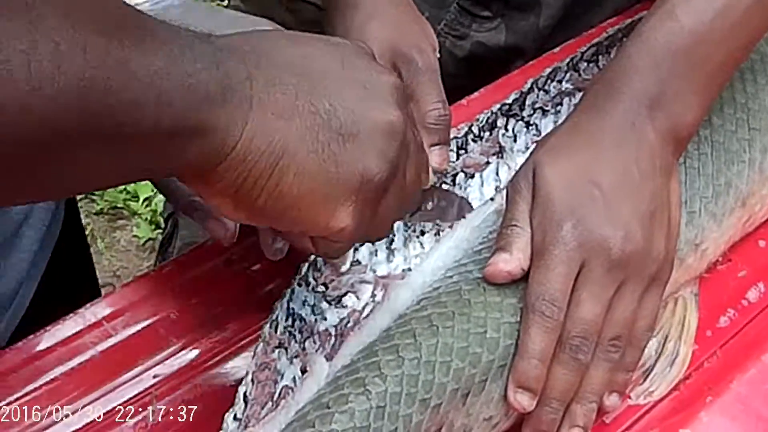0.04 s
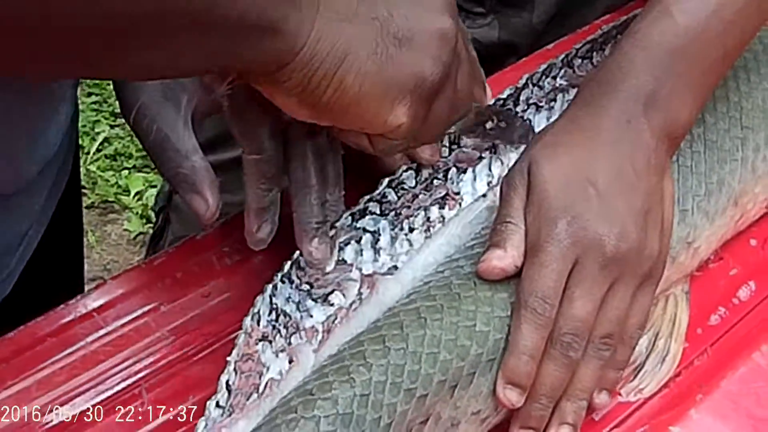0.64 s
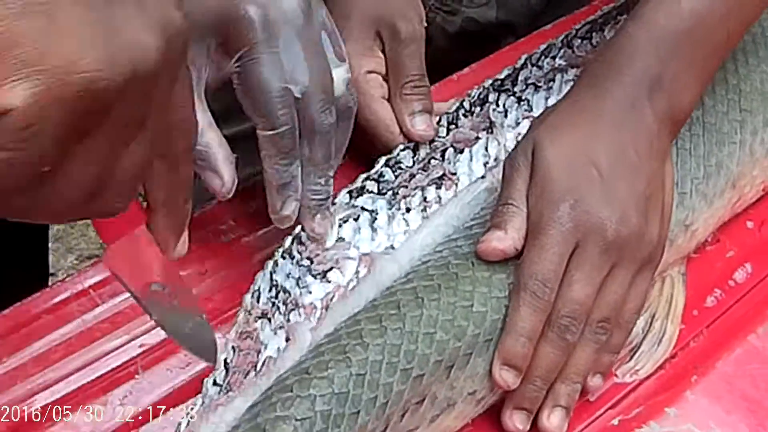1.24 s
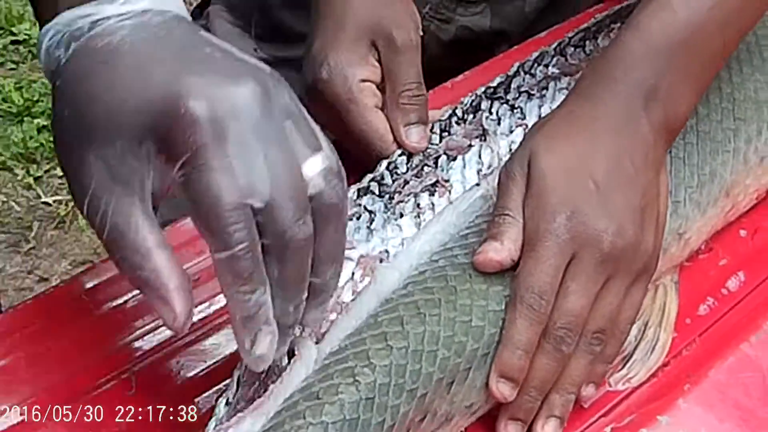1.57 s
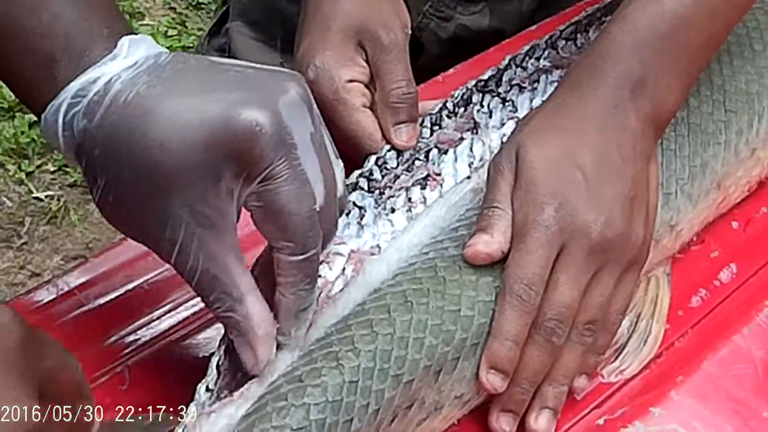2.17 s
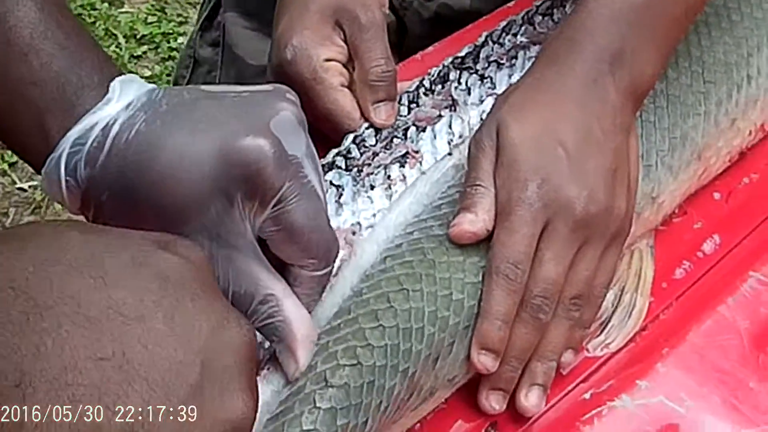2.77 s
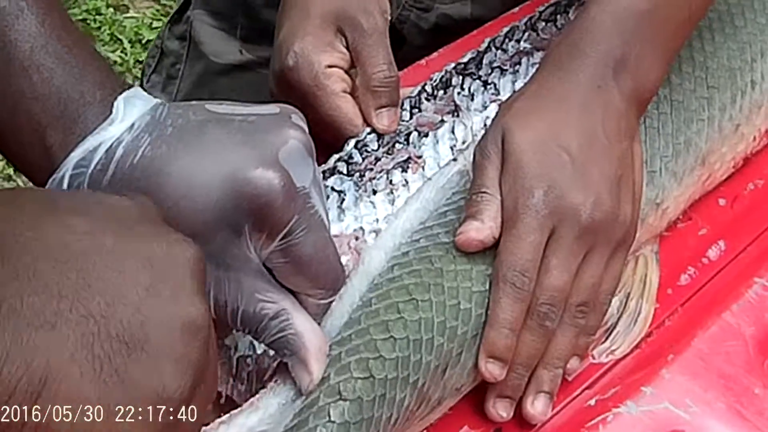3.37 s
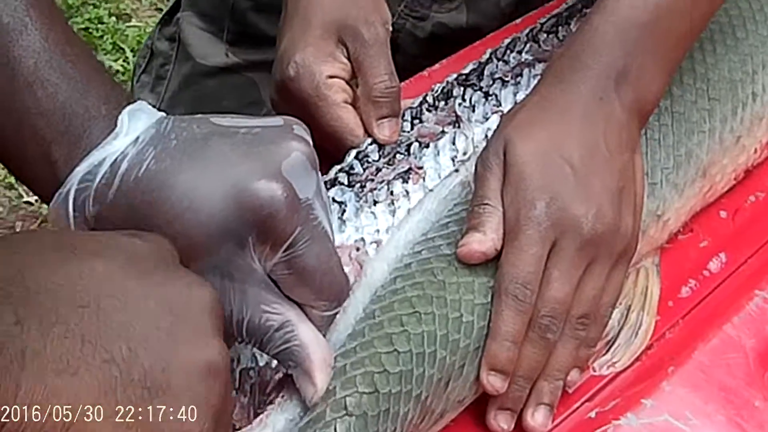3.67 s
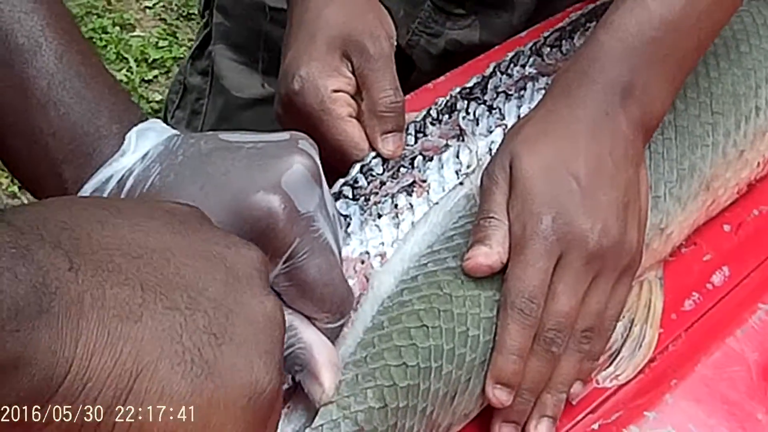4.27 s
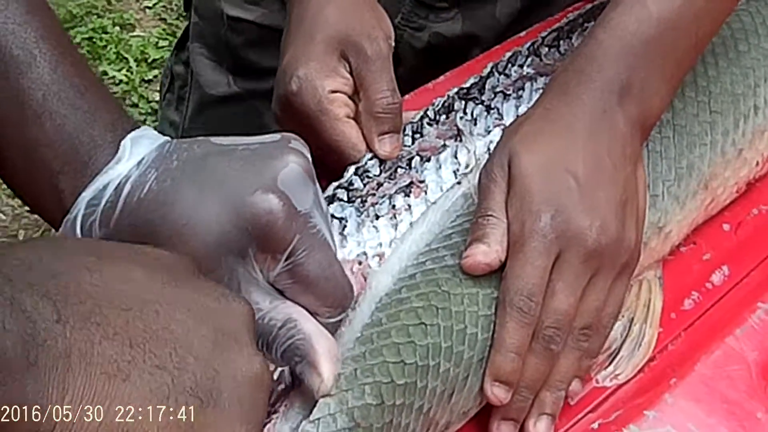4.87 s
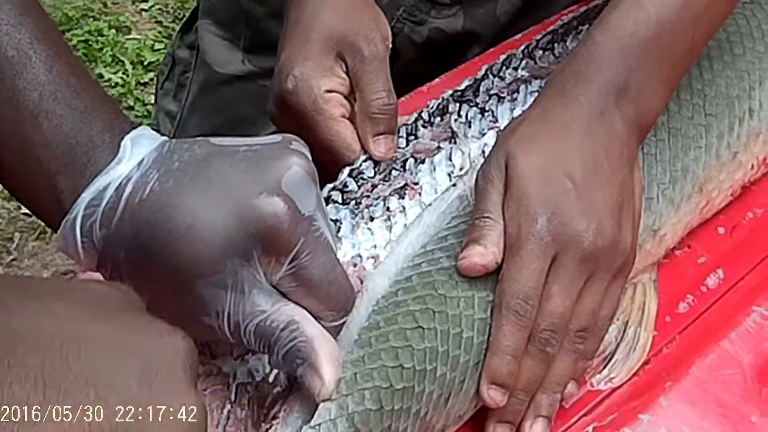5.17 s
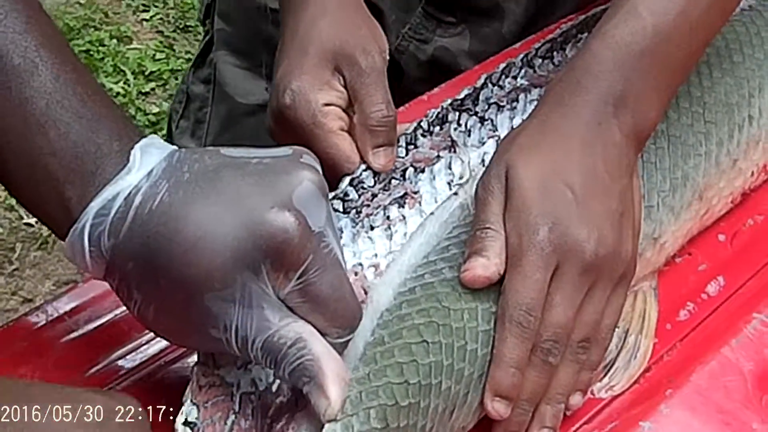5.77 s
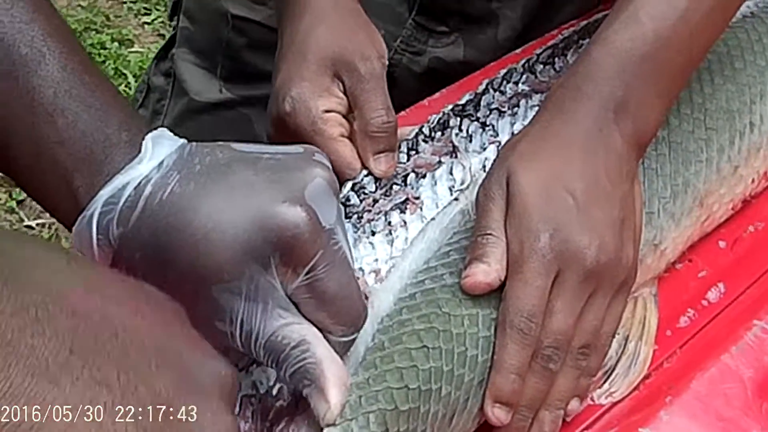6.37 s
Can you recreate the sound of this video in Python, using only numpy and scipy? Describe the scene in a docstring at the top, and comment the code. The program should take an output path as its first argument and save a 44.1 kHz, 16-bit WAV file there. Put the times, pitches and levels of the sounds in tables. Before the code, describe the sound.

Close up, a knife makes two hard, crunching scrapes along the armoured skin of a big fish, the scales snapping sharply. After a pause of about two seconds comes a run of shorter, softer cuts, each with a dull thump from the metal boat under the fish, which rocks in low bumps. Faint distant birds and quiet outdoor air lie behind, with a very faint thin whine and hiss from the recorder.

```python
"""Scales snap and grind, close up, as a knife hacks the armoured skin off a big fish outdoors.
The fish lies on an upturned metal boat, and every jerk of the blade thumps the hull through the flesh.
Two hard scrapes run along the back, then short cuts near the tail set the heavy body rocking.
Far birds and quiet air lie behind. The recorder adds a thin whine that swells with the knife's treble,
and a faint pulsing hiss."""
import sys
import numpy as np
from scipy import signal
from scipy.fft import rfft, irfft
from scipy.io import wavfile
from scipy.ndimage import uniform_filter1d

SR = 44100
rng = np.random.default_rng(int(sys.argv[2]) if len(sys.argv) > 2 else 0)


def to_wav(s):
    """Save 16-bit WAV."""
    ch = np.atleast_2d(s).T  # columns
    pcm = np.round(np.clip(ch, -1, 1) * 32767)  # PCM
    wavfile.write(sys.argv[1], SR, pcm.astype(np.int16))


N = 292383
T = np.arange(N) / SR
BUILD_DB = 25  # a stroke swells by this much as the pressure rises

# Knife strokes: start/s, pressure rise/s, hold/s, crack/dB, tick/dB, thump/dB
# Levels in all tables are relative, ahead of the mix.
STROKES = [(0.077, 0.1, .022, -42, -53, -42.5), (0.778, 0.045, 0.06, -66, -74, -62.5),
           (0.883, 0.06, 0.066, -35, -43, -39.5), (3.195, 0.069, 0.1, -74, -80, -68.5),
           (3.578, 0.031, 0.054, -63, -66, -53), (4.55, 0.047, .025, -63.5, -59.5, -47),
           (4.863, .02, 0.048, -61, -60.5, -46.5), (5.179, 0.023, .045, -60.5, -63.5, -45),
           (5.455, 0.044, 0.037, -58.5, -58.5, -48), (5.735, 0.057, 0.029, -59, -60, -44.5)]


def knife(tail_from_s=2):
    """Close up, each snap and rasp sounds as a crack, a bright tick and a thump into the hull."""
    # The scales that break loudest: t/s, crack/dB, tick/dB, thump/dB
    loud_snaps = [(0.1152, -47, -48, -49.5), (0.134, -42, -47, -44.5), (0.1515, -40, -42.5, -45),
                  (0.1679, -35.5, -38, -50.5), (0.1882, -29, -31.5, -38.5), (0.2049, -58, -64, -30),
                  (0.2145, -39, -42, -38), (.8314, -48.5, -65, -49), (.864, -45.5, -67, -47),
                  (0.8867, -44.5, -51, -40.5), (0.9015, -35.5, -41.5, -58), (0.9419, -29.5, -35.5, -42),
                  (0.9657, -23.5, -36, -51), (0.9917, -19.5, -38, -44), (1.0127, -44, -51, -30.5),
                  (1.0279, -46, -46, -31), (3.291, -68, -50, -65), (3.3475, -53, -60, -45),
                  (3.5899, -49.5, -53, -45.5), (3.616, -45.5, -47, -45.5), (3.9538, -55.5, -64, -40.5),
                  (4.5872, -51, -52.5, -44), (4.5998, -51, -53, -37), (4.7434, -60, -56.5, -55),
                  (4.865, -47, -48.5, -45.5), (4.8783, -42, -47, -37.5), (4.9248, -42, -49, -32),
                  (5.202, -44, -49, -39.5), (5.4771, -46.5, -51.5, -38), (5.4973, -47, -57, -32.5),
                  (5.554, -43, -43.5, -33.5), (5.7664, -56, -48.5, -51), (5.791, -51, -45, -54),
                  (5.8259, -31.5, -48, -21), (5.832, -28.5, -56, -33), (5.9555, -45, -70, -71)]
    # Spectra of cracks and ticks on the back and at the tail, and of the dead thump: f/Hz, level/dB
    back_crack = [(400, -11.5), (750, -10.5), (1180, -10.5), (1340, 1.5), (1500, -3), (1650, -3),
                  (2020, -1), (2700, -5.5), (3050, -20), (3700, -13.5), (4400, -14), (4900, -41),
                  (9000, -34)]
    tail_crack = [(400, -1.5), (900, -5.5), (1250, -4.5), (1650, -8.5), (2100, 0), (2500, -3.5),
                  (3150, -16), (4300, -11.5), (5400, -14.5), (9000, -27.5)]
    back_tick = [(3000, -21), (4800, -2), (6200, 0.5), (7900, -5), (8900, 1.5), (10200, -13), (11900, 5),
                 (13700, -8.5), (15000, -1), (16000, -3.5)]
    tail_tick = [(3000, -5.5), (4500, 2), (6800, -3), (7800, -3), (10200, -4), (12000, 0), (13700, -6),
                 (16000, -7)]
    dead_thump = [(50, -21.5), (100, -8), (150, 2.5), (450, 0), (700, -8), (1200, -10), (2500, -22.5),
                  (6000, -65)]
    times, crack_db, tick_db, thump_db = np.transpose(loud_snaps + ridges())
    rasp_db, hiss_db, drag_db = np.transpose(STROKES)[3:]
    breaks = snaps(times, crack_db, length_s=0.0011, tear_s=0.0011)
    breaks += grind(rasp_db, clicks_per_s=4000, judder_db=3)
    chips = snaps(times, tick_db, length_s=0.0014, tear_s=0.0013)
    chips += grind(hiss_db, clicks_per_s=7100, judder_db=0.5, release_s=0.012)
    push = jerks(times, thump_db) + grind(drag_db, clicks_per_s=1500, judder_db=2)
    back, tail = T < tail_from_s, T >= tail_from_s
    crack = colour(breaks * back, back_crack) + colour(breaks * tail, tail_crack)
    tick = colour(chips * back, back_tick) + colour(chips * tail, tail_tick)
    thump = colour(push, dead_thump)
    direct = undb(0.4) * crack + undb(-2.5) * tick + undb(-6) * thump
    # countless weaker hull modes blur into a short wash
    wash = undb(-12) * diffuse(crack, t60=0.16, rise_s=0.0033)
    wash += undb(-10) * diffuse(tick, t60=0.16, rise_s=0.0012)
    wash += undb(-11.5) * diffuse(thump, t60=0.48, rise_s=0.0031)
    return direct + hull(push, breaks, back, tail) + wash


def ridges(count=7, jitter=0.25, scatter_db=3):
    """The edge trips over unevenly spaced scales; each snaps as hard as the blade presses."""
    over_grind_db = [0.5, -1.5, -2]  # crack, tick, thump
    rows = []
    for start, rise, hold, *stroke_db in STROKES:
        for k, (late, strength, weight) in enumerate(rng.standard_normal((count, 3))):
            age = (k + 0.5 + jitter * late) / count * (rise + hold)
            press_db = np.interp(age, [0, rise], [-BUILD_DB, 0])
            chance_db = scatter_db * np.array([strength, strength, weight])
            rows.append((start + age, *(press_db + chance_db + stroke_db + over_grind_db)))
    return rows


def snaps(times, levels_db, length_s, tear_s):
    """A scale tears in a brief spray of fractures, with the energy of its level held for length_s."""
    track, t = np.zeros(N), T[:SR // 60]
    for s, db in zip(times, levels_db):
        burst = rng.standard_normal(len(t)) * t * np.exp(-t / tear_s)
        add(track, s, burst / np.linalg.norm(burst) * undb(db) * np.sqrt(length_s * SR))
    return track


def grind(levels_db, clicks_per_s, judder_db, release_s=0.038):
    """The edge rasps over bony ridges: dense clicks swell with pressure and judder as it sticks."""
    pressure = np.zeros(N)
    for (start, rise, hold, *_), db in zip(STROKES, levels_db):
        corners = start + np.cumsum([0, rise, hold, release_s])
        press_db = np.interp(T, corners, [-BUILD_DB, 0, 0, -BUILD_DB])
        pressure += undb(db + press_db) * (T > start) * (T < corners[-1])
    clicks = (rng.random(N) < clicks_per_s / SR) * rng.standard_normal(N)
    return pressure * unit(clicks * undb(judder_db * walk(350)))


def jerks(times, levels_db, length_s=0.0056, usual_contact_s=0.0026, usual_db=-43, hardening=0.97):
    """At each snap the blade jumps and pushes on the flesh; a soft push lasts longer, so is deeper."""
    track, t = np.zeros(N), T[:SR // 60]
    for s, db in zip(times, levels_db):
        stretch = undb(-hardening * (db - usual_db))
        pulse = np.sin(np.pi * np.minimum(t / (usual_contact_s * stretch), 1)) ** 2
        impulse = stretch ** 0.35 * undb(db + 3.5) * np.sqrt(length_s * SR)
        add(track, s, impulse * pulse / pulse.sum())
    return track


def hull(push, breaks, back, tail):
    """The boat booms with soft pushes through the flesh; hard breaks excite its shrill modes."""
    # Hull modes: f/Hz, t60/s, level/dB when pushed under the fish's back, level/dB near its tail
    modes = [(129.4, 0.31, -9.5, 8.5), (155.3, 0.2, -14, 3), (171.9, 0.48, -7, -2.5), (192.3, 0.24, -12, 0),
             (227.5, 0.34, -5, -2), (249.7, 0.46, -9.5, -18), (295, 0.24, -8, -0.5),
             (306.6, 0.23, -14, -8.5), (383, 0.11, 8, 1.5), (436, 0.14, 7.5, 10), (475, 0.057, -1, 7),
             (512, 0.21, -9.5, -10), (556.3, 0.18, 1.5, -6.5), (660, 0.16, 0, -1), (745, 0.13, -8.5, -8),
             (820, 0.17, -6, 0), (937, 0.15, -2, -6), (1016, 0.11, 1, 0), (1181, 0.15, -3, -7),
             (1288, 0.14, -2.5, -5.5), (1352, 0.36, -5, -12.5), (1390, 0.11, -4, -10), (1828, 0.16, 3, -12),
             (1795, 0.06, 8, -17.5), (1990, 0.037, 5, -9), (2058, 0.065, 3, 4), (2250, 0.064, -6, -4),
             (2393, 0.07, -6, -3.5), (2623, 0.087, -13, -3)]
    low = [mode for mode in modes if mode[0] < 1400]
    high = [mode for mode in modes if mode[0] >= 700]
    boom = undb(-2) * sheet_metal(push * back, low, zone=0)
    boom += undb(-2.5) * sheet_metal(push * tail, low, zone=1)
    clank = undb(-9.5) * sheet_metal(breaks * back, high, zone=0)
    clank += undb(-6.5) * sheet_metal(breaks * tail, high, zone=1)
    return boom + clank


def sheet_metal(force, modes, zone):
    """The metal rings on; where it is pushed (zone 0 back, 1 tail) decides which modes speak."""
    t = T[:SR // 2]
    partials = [(-1) ** k * undb(db[zone]) * np.sin(2 * np.pi * hz * t) * fade(t, t60)
                for k, (hz, t60, *db) in enumerate(modes)]
    return ring(force, sum(partials))


def rocking(hz=68, swell_s=0.0069):
    """The fish's weight rocks on the hull in soft low bumps, each a cycle or two."""
    # Bumps of the body: t/s, level/dB
    bumps = [(4.744, -46.5), (4.783, -47.5), (5.019, -54), (5.317, -51), (5.83, -57)]
    track, t = np.zeros(N), T[:SR // 5]
    envelope = t / swell_s * np.exp(1 - t / swell_s)
    for s, db in bumps:
        add(track, s, undb(db) * np.sqrt(2) * np.sin(2 * np.pi * hz * t) * envelope)
    return track


def whine(cutting, ring_s=0.044, swell_db=-9, fade_from_s=5.9, fade_db_per_s=7):
    """The recorder's thin whine swells with the knife's treble and sinks away after the last cut."""
    # Tones of the whine: f/Hz, level/dB
    partials = [(8559, -101), (8626, -79.5), (8692, -86), (8760, -95)]
    treble = signal.sosfilt(signal.butter(2, [8000, 9300], "band", fs=SR, output="sos"), cutting)
    decay = np.exp(-1 / (ring_s * SR))
    treble_power = signal.lfilter([1 - decay], [1, -decay], treble ** 2)
    tone = sum(undb(db) * np.sqrt(2) * np.sin(2 * np.pi * np.cumsum(hz + 1.5 * walk(8.5)) / SR)
               for hz, db in partials)
    floor = np.std(tone) * undb(-fade_db_per_s * np.maximum(T - fade_from_s, 0))
    return unit(tone) * np.sqrt(floor ** 2 + undb(swell_db) ** 2 * treble_power)


def birds():
    """Far trilled whistles reach the microphone only as a smear of echoes from the trees."""
    # The clearest calls: t/s, length/s, start f/Hz, end f/Hz, trill/share of the pitch, level/dB
    calls = [(1.629, 0.11, 4350, 3820, 0.064, -72), (1.814, 0.052, 4150, 3880, 0.057, -77),
             (2.71, 0.13, 4130, 3530, .07, -73), (3.92, 0.11, 2640, 2643, 0.013, -70),
             (6.424, .18, 2970, 2820, 0.023, -76)]
    whistles, chorus = np.zeros(N), np.zeros(N)
    wobble = walk(200)
    for s, length, start_hz, end_hz, trill, db in calls:
        n = int(length * SR)
        hz = np.linspace(start_hz, end_hz, n) * (1 + trill * wobble[int(s * SR):][:n])
        tone = np.sin(2 * np.pi * np.cumsum(hz) / SR)
        add(whistles, s, undb(db) * np.sqrt(2) * np.hanning(n) * tone)
    # birds farther off merge into a faint restless chorus
    for hz in (2380, 2620, 2850):
        band = [(0.86 * hz, -30), (hz, 0), (1.14 * hz, -30), (2 * hz, -60)]
        chorus += colour(rng.standard_normal(N), band) * undb(5.7 * walk(11))
    return undb(2.5) * diffuse(whistles, t60=0.56, rise_s=0.0038) + undb(-89) * chorus


def background(swell_start_s=1.077, swell_s=0.19):
    """Quiet air and a restless rumble, plus a faint recorder hiss that swells once a second."""
    # Spectra of the air and the rumble: f/Hz, level/dB
    air_spectrum = [(12, -28), (20, -1.5), (81, -1), (113, -0.5), (203, -8.5), (233, -8.5), (365, -12.5),
                    (554, -15), (713, -16.5), (1250, -18), (1470, -21.5), (3910, -27.5), (5780, -29.5),
                    (8790, -29.5), (15800, -31.5)]
    rumble_spectrum = [(20, -1.5), (60, 0), (130, -18), (400, -29), (2000, -36)]
    air = unit(colour(rng.standard_normal(N), air_spectrum)) * undb(-61.5 + 0.043 * walk(0.88))
    rumble = colour(rng.standard_normal(N), rumble_spectrum) * undb(-75 + 2.3 * walk(9))
    swelling = ((T - swell_start_s) % 1 < swell_s) & (T > swell_start_s)
    hiss = undb(-70) * uniform_filter1d(swelling.astype(float), SR // 30) * rng.standard_normal(N)
    return air + rumble + hiss


def undb(db):
    """Decibels to amplitude."""
    return 10 ** (np.asarray(db) / 20)


def unit(x):
    """Scale to rms 1."""
    return x / np.sqrt(np.mean(x ** 2))


def add(track, s, x):
    """Mix a short sound into a track at time s."""
    i = max(int(s * SR), 0)
    track[i:i + len(x)] += x[:N - i]


def ring(x, response):
    """Pass a sound through a response scaled to unit energy."""
    return signal.fftconvolve(x, response / np.linalg.norm(response))[:N]


def colour(x, points, size=4096):
    """Causal filter through (f/Hz, level/dB) points; white noise keeps its power."""
    hz, db = np.transpose(points)
    bin_hz = np.maximum(np.arange(size // 2 + 1) * SR / size, 1)
    gain = undb(np.interp(np.log(bin_hz), np.log(hz), db))
    cepstrum = irfft(np.log(gain))
    cepstrum[1:size // 2] *= 2  # fold to minimum phase
    cepstrum[size // 2 + 1:] = 0
    return ring(x, irfft(np.exp(rfft(cepstrum))))


def walk(rate_hz):
    """A smooth random wander of rms 1."""
    k = int(SR / rate_hz)
    steps = np.repeat(rng.standard_normal(N // k + 1), k)
    return unit(uniform_filter1d(uniform_filter1d(steps, k), k)[:N])


def fade(t, t60):
    """Decay by 60 dB in t60 seconds."""
    return np.exp(-np.log(1000) * t / t60)


def diffuse(x, t60, rise_s):
    """A dense tail that builds up and dies away."""
    t = T[:SR // 2]
    return ring(x, rng.standard_normal(len(t)) * fade(t, t60) * (1 - np.exp(-t / rise_s)))


def scene():
    """Knife, fish and boat in front, birds and air behind, with the recorder's whine and hiss; mono."""
    cutting = knife()
    return (cutting + rocking() + whine(cutting) + birds() + background())[None]


def record(dry, top_hz=15800):
    """The recorder cuts the top treble steeply."""
    return signal.sosfilt(signal.ellip(10, 0.2, 70, top_hz, fs=SR, output="sos"), dry)


dry = scene()
out = record(dry)
to_wav(out)
```